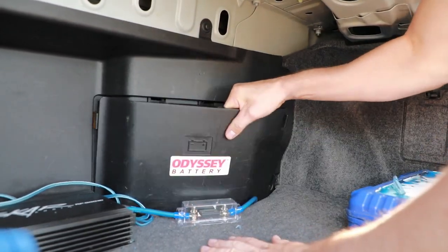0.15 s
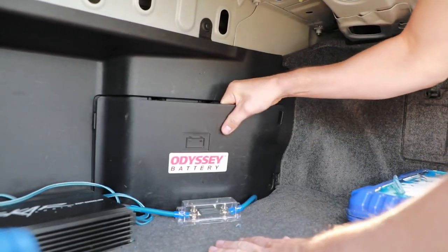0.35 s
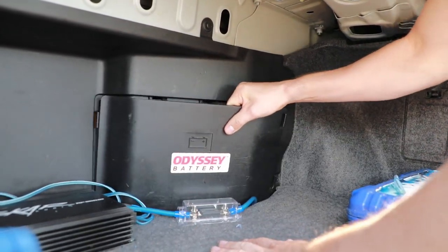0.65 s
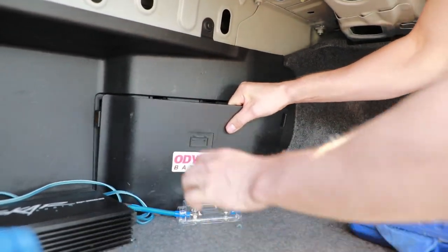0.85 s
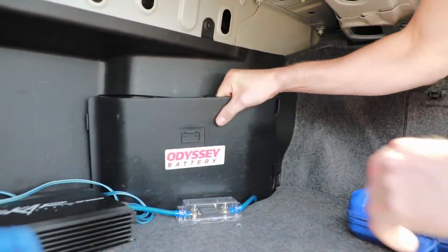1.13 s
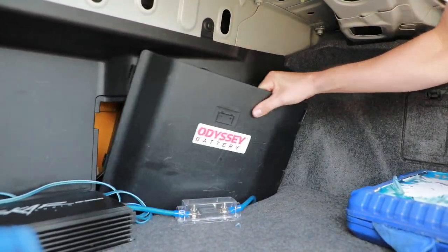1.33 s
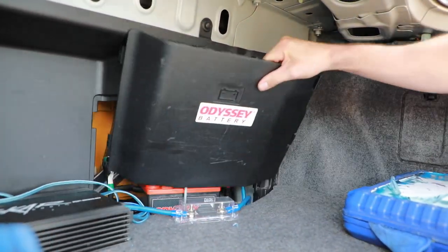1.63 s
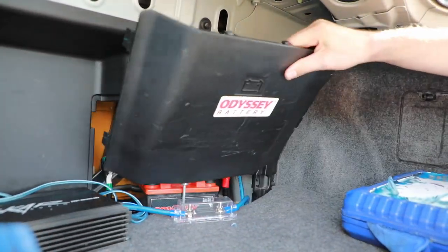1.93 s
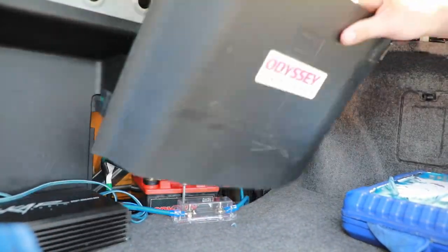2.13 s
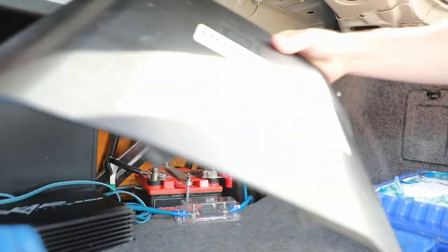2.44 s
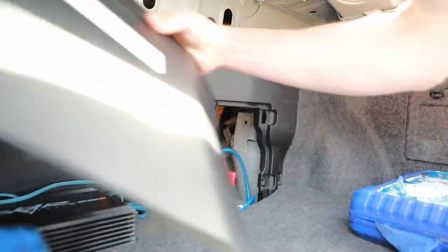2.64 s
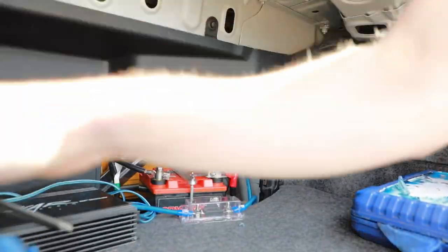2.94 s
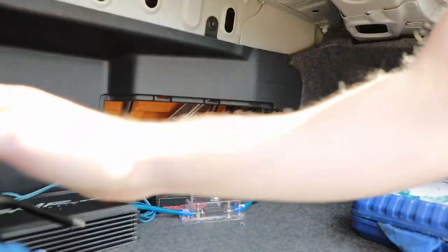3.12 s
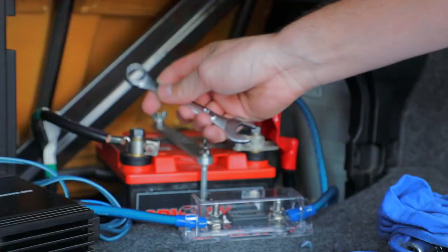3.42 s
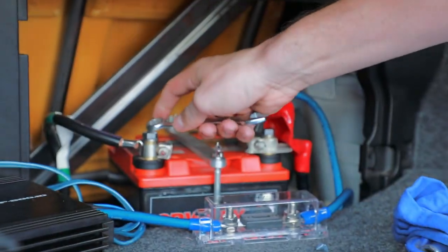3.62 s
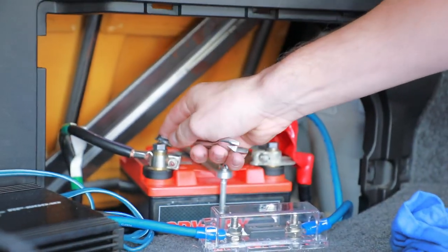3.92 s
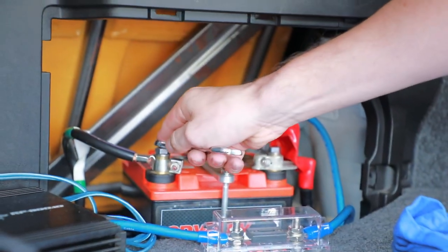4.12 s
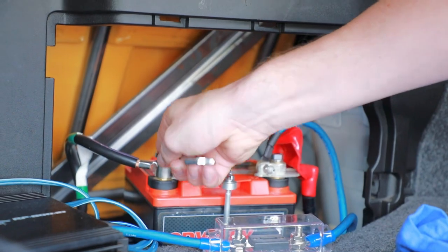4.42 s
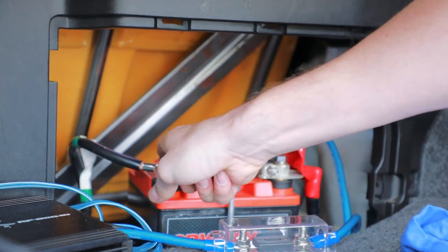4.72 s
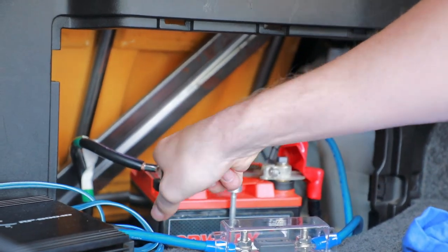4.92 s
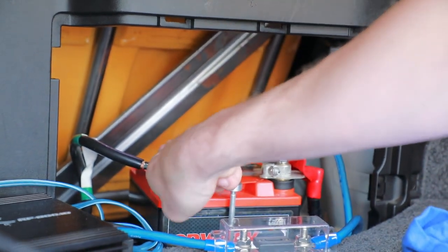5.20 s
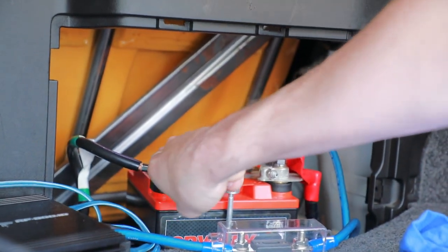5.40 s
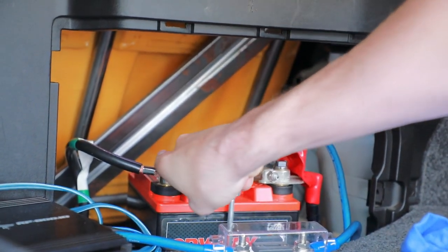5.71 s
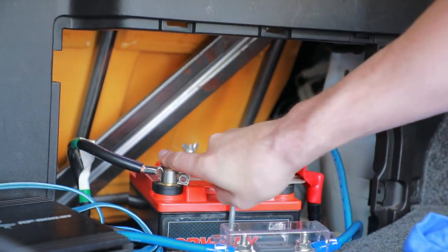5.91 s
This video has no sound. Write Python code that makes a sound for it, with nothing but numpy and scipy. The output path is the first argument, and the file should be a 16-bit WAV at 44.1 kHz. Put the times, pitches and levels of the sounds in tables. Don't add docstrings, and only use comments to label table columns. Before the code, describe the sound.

Hollow knocks and creaky friction come from a plastic cover being pried off, loudest as its clips snap free, with a short boxy reverberation. A flop, a clack and a dry scrape follow as it is put away. Then it turns quiet: bright steel ticks with short rings, soft knuckle brushing, tiny muffled contacts, a swelling far machine hum and a few thin bird whistles over steady road drone. Close microphone, slight hiss.

```python
import sys
import numpy as np
from scipy import signal
from scipy.fft import rfft, irfft
from scipy.io import wavfile
from scipy.ndimage import uniform_filter1d, map_coordinates

SR = 44100
rng = np.random.default_rng(int(sys.argv[2]) if len(sys.argv) > 2 else 0)


def file_out(sig):
    cols = np.atleast_2d(sig).T
    lim = np.clip(cols, -1, 1)
    pcm = np.round(lim * 32767).astype(np.int16)
    wavfile.write(sys.argv[1], SR, pcm)


def field_ratio(decibels):
    return 10 ** (np.asarray(decibels, dtype=float) / 20)


N = 267025
T = np.arange(N) / SR


def unit(x):
    return x / np.sqrt(np.mean(x ** 2) + 1e-20)


def peak(x):
    return x / np.max(np.abs(x))


def along(points, hz):
    f, v = np.transpose(points)
    return np.interp(np.log(hz + 1), np.log(f + 1), v)


def wobble(rate):
    knots = rng.standard_normal(int(N * rate / SR) + 4)
    return map_coordinates(knots, [T * rate])


def kernel(spectrum):
    hz = np.fft.rfftfreq(4096, 1 / SR)
    cepstrum = irfft(np.log(field_ratio(along(spectrum, hz))))
    cepstrum[1:2048] *= 2
    cepstrum[2049:] = 0
    h = irfft(np.exp(rfft(cepstrum)))
    return h / np.linalg.norm(h)


def ringing(modes, scatter_db):
    t = T[:SR // 4]
    h = np.zeros(len(t))
    for hz, db, t60 in modes:
        decay = field_ratio(db + scatter_db * rng.standard_normal() - 60 * t / t60)
        h += decay * np.sin(2 * np.pi * hz * t) * (1 - np.exp(-t / 0.001))
    return h / np.linalg.norm(h)


def chatter(t60, spiky, rise=0.00021, hold=0):
    t = T[:SR // 8]
    decay = field_ratio(-60 * np.maximum(t - hold, 0) / t60)
    onset = (1 - np.exp(-t / rise)) ** 2
    first_blow = 1 + 0.55 * np.exp(-t / 0.00069)
    bounces = rng.standard_normal(len(t)) * np.exp(spiky * rng.standard_normal(len(t)))
    return bounces * decay * onset * first_blow


def add(track, s, x):
    part = track[round(s * SR):][:len(x)]
    part += x[:len(part)]


def through(x, h):
    return signal.fftconvolve(x, h)[:max(len(x), len(h))]


def patchy(x, depth_db):
    z = signal.stft(np.pad(x, (0, 512)), nperseg=512)[2]
    field = rng.standard_normal(z.shape)
    field = uniform_filter1d(field, size=8, axis=0)
    field = uniform_filter1d(field, size=18, axis=1)
    return signal.istft(z * field_ratio(depth_db * unit(field)), nperseg=512)[1][:N]


# (frequency [Hz], density [dB per Hz])
TRAFFIC = [(20, -14), (55, 10), (90, -10), (200, -1.5), (450, -3), (900, 2.5), (1400, -0.5), (2200, -8),
           (3200, -18.5), (4000, -30.5), (4600, -57.5), (6000, -120)]


def traffic():
    air = patchy(rng.standard_normal(N), depth_db=2.0)
    level_db = -51.5 + .5 * wobble(0.36)
    return field_ratio(level_db) * unit(through(air, kernel(TRAFFIC)))


def strokes(rows):
    curves = [db - 20 * np.maximum((s - T) / rise, (T - s) / fall) for s, rise, fall, db in rows]
    return np.max(curves, axis=0)


# (frequency [Hz], density [dB per Hz])
RUB_BODY = [(50, -46), (100, -21.5), (300, 3), (700, -5), (1100, 0), (2000, -5.5), (3000, -9), (4500, -25),
            (6000, -35.5)]
RUB_RUSTLE = [(2000, -34), (3500, -6), (4600, -4), (5500, -12), (6900, 0), (8000, -4), (8800, -2),
              (9700, -5), (10600, 0), (11500, -3), (12400, -4), (13500, -12), (15100, -20), (16500, -50)]


def rub(body_db, rustle_db, spiky, lumpy_db):
    def slips():
        clumps = field_ratio(lumpy_db * wobble(45.31))
        return rng.standard_normal(N) * np.exp(spiky * wobble(900)) * clumps

    body = unit(through(slips(), kernel(RUB_BODY)))
    rustle = unit(patchy(through(slips(), kernel(RUB_RUSTLE)), depth_db=2))
    return field_ratio(body_db) * body + field_ratio(rustle_db) * rustle


def stroked(rows, spiky, lumpy_db):
    body_db = strokes([row[:4] for row in rows])
    rustle_db = strokes([(s, rise, fall, db + over_db) for s, rise, fall, db, over_db in rows])
    return rub(body_db, rustle_db, spiky, lumpy_db)


# (peak time [s], rise [s], fall [s], body level [dB], rustle over body [dB])
DRAG = [(.15, 0.25, 0.34, -44, -16.5), (.45, 1, 0.56, -48.5, -14), (.89, 0.077, 0.44, -45.5, -31),
        (1.16, 0.11, 0.31, -40, -13.5), (1.29, 0.051, 0.14, -29.5, -16.5),
        (1.575, 0.075, 0.44, -40.5, -8.5), (1.612, 0.062, 0.16, -33.5, -16), (1.95, 0.7, 0.95, -52, -3.5),
        (2.3, 0.49, 0.53, -52, -15), (2.5, 0.8, 0.4, -54, -6), (3.085, 0.36, 0.074, -50.5, -2)]


def dragging():
    free_s = 1.75
    lumpy_db = np.where(T < free_s, 3.5, .9)
    return field_ratio(-4.0) * stroked(DRAG, spiky=.2, lumpy_db=lumpy_db)


# (frequency [Hz], density [dB per Hz])
WOBBLE = [(60, -20.5), (110, 0.5), (140, 2), (200, -8), (400, -33.5)]
# (peak time [s], rise [s], fall [s], level [dB])
FLEXING = [
    (.35, 1.3, 0.3, -64),
    (.95, 0.13, 0.23, -52.5),
    (1.25, 0.38, 0.26, -56),
    (1.7, 0.35, 0.37, -59),
    (2.33, 0.1, 0.33, -61),
]


def flexing():
    return field_ratio(strokes(FLEXING)) * unit(through(rng.standard_normal(N), kernel(WOBBLE)))


# (frequency [Hz], density [dB per Hz])
THUMP = [(40, -24), (100, -13.5), (220, 4), (450, 1), (800, -47), (2000, -92)]
# (frequency [Hz], level [dB], T60 [s])
PANEL = [(125, -10, .3), (215, -14, .06), (253, -3, .16), (300, -9, .12), (484, 1, .075), (545, -1, .06),
         (600, -3, .065), (651, -4, .07), (883, -11, .09), (1238, -9, .09), (1384, -5, .08),
         (1523, -5, .065), (1950, -2, .055), (2300, -6, .05)]
# (time [s], thump level [dB], ring level [dB], chatter T60 [s])
THUDS = [(0.012, -28.5, -68, 0.033), (.059, -32, -72, 0.032), (0.23, -34.5, -62, 0.15),
         (0.294, -34.5, -69, 0.083), (0.429, -23.5, -70, 0.041), (.831, -36, -70, 0.028),
         (.933, -23, -69.5, 0.08), (1.38, -40, -66, .04), (1.801, -33, -68, 0.028), (2.068, -57, -73, .03),
         (2.199, -50, -70, 0.018), (2.243, -32.5, -14.5, 0.029), (3.439, -50, -72, 0.026)]


def thuds():
    out, thump = np.zeros(N), kernel(THUMP)
    for s, thump_db, ring_db, t60 in THUDS:
        force = chatter(t60, spiky=0.12, rise=0.001)
        force[0] = 1.24 * np.linalg.norm(force)
        add(out, s, field_ratio(thump_db) * peak(through(force, thump)))
        rattle = chatter(0.06, spiky=0.28, rise=.0005, hold=0.0091)
        rattle = rattle / np.linalg.norm(rattle)
        add(out, s - .004, field_ratio(ring_db) * through(rattle, ringing(PANEL, scatter_db=1)) * 20)
    return out


# (frequency [Hz], density [dB per Hz])
BOOM = [(50, -54), (100, -8), (200, 1.5), (450, 5.5), (800, -3), (1600, -36.5)]
CLACK = [(300, -28.5), (700, -5.5), (1400, 3), (2600, -2.5), (4000, -15), (7000, -31.5)]
CRACK = [(2200, -40), (3600, -4), (5500, -7), (7500, 0), (11000, -3), (13000, -15), (16000, -34)]
# (time [s], peak level [dB], crack level [dB], local note [Hz], chatter T60 [s])
ROCKING = [(0.013, -27.5, -41, 520, 0.023), (0.066, -15, -18, 890, 0.031), (0.103, -33.5, -22, 420, 0.019),
           (.137, -37, -25, 410, 0.065), (0.157, -33.5, -23, 525, 0.024), (.166, -30, -26, 880, 0.027),
           (0.291, -32, -27, 1440, 0.028), (.3, -38.5, -29, 500, 0.056), (.327, -41, -23, 900, 0.019),
           (.418, -30, -25, 616, 0.037), (0.408, -30, -25, 920, 0.025), (0.428, -13.5, -47, 420, 0.012),
           (0.44, -16.5, -39, 950, 0.016), (0.515, -34, -24, 1450, 0.03), (.531, -37.5, -36, 1980, 0.012),
           (0.564, -43, -33, 915, 0.047), (.585, -37.5, -22, 1210, 0.08), (0.615, -31.5, -26, 2030, 0.027),
           (0.635, -34, -20, 1910, 0.03), (0.671, -44, -29, 926, 0.037), (0.732, -32.5, -24, 930, 0.11),
           (0.78, -33.5, -41, 405, 0.028), (.774, -44, -35, 900, 0.016), (0.82, -40, -20, 1180, 0.043),
           (.846, -40.5, -25, 880, 0.043)]
UNCLIPPING = [(.901, -35.5, -30, 950, 0.066), (.928, -28, -26, 446, 0.037), (.94, -10.5, -19, 930, 0.057),
              (1.008, -33, -26, 1000, 0.024), (1.069, -36.5, -28, 890, 0.077),
              (1.089, -24, -27, 397, 0.019), (1.101, -24, -30, 1380, 0.044), (1.117, -19.5, -27, 700, .03),
              (1.1435, -22, -12, 1500, 0.016), (1.1478, -3.5, -11.5, 1514, 0.03),
              (1.153, -17, -17.5, 1713, 0.051), (1.2, -20.5, -25.5, 732, 0.037),
              (1.216, -27.5, -17.5, 1230, 0.02), (1.231, -16.5, -25, 1513, 0.093),
              (1.2435, -5.5, -24, 952, 0.045), (1.253, -1.5, -25.5, 597.5, .06),
              (1.262, -5.5, -18, 645, 0.055), (1.272, -14.5, -18, 500, 0.057),
              (1.2865, -1.5, -9, 1900, 0.016), (1.29, -8.5, -10.5, 1913, 0.046),
              (1.296, -15, -11.5, 1028, .04), (1.308, -11.5, -17.5, 1330, 0.053),
              (1.32, -15.5, -18.5, 1200, .05), (1.33, -21, -28.5, 1900, 0.033),
              (1.343, -24.5, -33, 1970, 0.028)]
LIFTING = [(1.405, -19, -30, 1800, 0.05), (1.411, -24, -25, 2350, 0.047),
           (1.418, -26.5, -18.5, 1640, 0.014), (1.595, -35, -20, 1920, 0.071),
           (1.609, -36, -20, 1490, 0.055), (1.6215, -7.5, -13.5, 1010, 0.044), (1.629, -16, -14, 696, 0.06),
           (1.643, -17, -18, 880, 0.07), (1.664, -17, -18, 1410, 0.044), (1.686, -16.5, -15, 1110, 0.041),
           (1.691, -14, -14.5, 1520, 0.06), (1.711, -17, -27, 1250, 0.049), (1.753, -33.5, -31, 845, 0.034),
           (1.807, -29.5, -26, 537, 0.024), (1.8255, -19.5, -33, 1050, 0.012),
           (1.862, -38, -7, 1810, 0.044), (1.87, -39, -5.5, 1380, 0.04), (1.895, -34.5, -20, 1420, 0.04),
           (1.908, -43, -30, 950, 0.027)]
LAYING = [(2.238, -5, -17.5, 1560, 0.062), (2.509, -43, -10, 875, 0.026), (2.693, -42.5, -12, 1140, 0.028),
          (2.734, -40.5, -6, 1100, 0.024), (2.743, -36.5, -13, 1740, 0.032), (2.796, -35, -11, 1650, 0.04),
          (2.858, -22, -26, 2080, 0.037), (2.908, -26.5, -30, 520, 0.049), (2.872, -13, -21.5, 984, 0.04),
          (2.949, -27.5, -26, 1310, 0.038), (2.967, -29.5, -5, 2020, 0.022),
          (3.024, -36, -16, 1100, 0.0087), (3.084, -42.5, -15.5, 840, 0.04)]
IN_BETWEEN = [
    (1.122, -20, -18, 2300, 0.023),
    (1.163, -19, -31, 420, .03),
    (1.2575, -8, -20.5, 850, .025),
    (1.277, -14.5, -24.5, 420, .03),
    (1.2965, -14, -5.5, 2600, .04),
    (1.339, -18.5, -28, 695, 0.019),
    (2.251, -13.5, -19, 1400, 0.014),
    (2.258, -17.5, -24, 606, 0.021),
]


def knocks():
    out, boom, clack, crack = np.zeros(N), kernel(BOOM), kernel(CLACK), kernel(CRACK)
    stages = ((ROCKING, -10), (UNCLIPPING, -10), (LIFTING, -11.5), (LAYING, -25), (IN_BETWEEN, -14))
    for rows, seated_db in stages:
        for s, db, crack_db, hz, t60 in rows:
            boom_db = seated_db - 0.27 * (db + 25)
            rise = .0002 + .00009 * max(-5 - db, 0)
            force = chatter(t60, spiky=0.13, rise=rise)
            note = ringing([(hz, 0, .01)], scatter_db=0)
            low = through(chatter(1.4 * t60, spiky=0.4, rise=rise), boom)
            mid = through(force, .75 * clack + 0.63 * note[:4096])
            high = through(chatter(t60, spiky=0.19, rise=rise), crack)
            add(out, s, field_ratio(db - 1.54) * peak(mid))
            add(out, s, field_ratio(db + boom_db + 3.0) * peak(low))
            add(out, s, field_ratio(db + crack_db + 7.5) * peak(high))
    return out


# (from [s], to [s], level [dB])
CARRY = (1.56, 3.1, -63)


def carrying():
    start, end, db = CARRY
    fade = np.clip(np.minimum((T - start) / .15, (end - T) / .04), 0, 1)
    return fade * rub(db - 3, db + 1.2 * wobble(5), spiky=.1, lumpy_db=1)


# (time [s], peak level [dB], from [Hz], to [Hz], fall [s], T60 [s])
FLOP = (2.128, -30, 560, 90, .006, .045)


def flop():
    out, t = np.zeros(N), T[:SR // 8]
    s, db, from_hz, to_hz, fall, t60 = FLOP
    hz = to_hz + (from_hz - to_hz) * np.exp(-t / fall)
    envelope = field_ratio(-60 * t / t60) * (1 - np.exp(-t / .004)) ** 2
    add(out, s, field_ratio(db) * peak(envelope * np.sin(2 * np.pi * np.cumsum(hz) / SR)))
    return out


# (frequency [Hz], gain [dB])
SLIDE_THIN = [(100, -6), (400, -11), (1000, -5), (16000, -1)]
# (peak time [s], rise [s], fall [s], body level [dB], rustle over body [dB])
SLIDE = [
    (2.803, 0.0071, 0.044, -33.5, -5),
    (2.818, 0.03, 0.035, -27.5, -12),
    (2.864, 0.034, .04, -26.5, -1),
    (2.895, 0.06, 0.047, -29, -3.5),
    (2.951, 0.0079, 0.035, -26, -11),
    (2.968, 0.023, .03, -35, -10.5),
]


def scraping():
    thin = kernel(SLIDE_THIN)
    return through(stroked(SLIDE, spiky=0.25, lumpy_db=1.0), thin / np.max(np.abs(rfft(thin))))


def pings(hits, modes):
    out = np.zeros(N)
    for s, db in hits:
        add(out, s, field_ratio(db) * peak(ringing(modes, scatter_db=1)))
    return out


# (frequency [Hz], level [dB], T60 [s])
PART = [(1280, -5, .03), (1530, -2, .02), (1800, -6, .015), (2100, -6, .02), (3280, -8, .06),
        (5200, -22, .006)]
# (time [s], peak level [dB])
PING = [
    (3.252, -27),
]


def dropped_part():
    return pings(PING, PART)


# (frequency [Hz], density [dB per Hz])
SNAP = [(2500, -50.5), (4000, -14), (5500, -6), (7500, -0.5), (10000, -7), (13000, -15), (16000, -32.5)]
# (frequency [Hz], level [dB], T60 [s])
STEEL = [(7320, -17, .022), (9460, -5, .022), (9680, 0, .032), (9870, -3, .024), (10900, -17, .02),
         (11500, -17, .015), (13400, -26, .015), (14290, -13, .022)]
# (frequency [Hz], level [dB], T60 [s])
NUT = [(275, -11, .09), (390, -8, .05), (580, -2, .045), (870, -2, .04), (1840, -1, .009), (2300, 0, .008),
       (2750, -7, .006), (4200, -13, .006)]
# (time [s], peak level [dB], nut knock [dB], ring share [dB], own note [Hz])
TICKS = [(3.5557, -62.5, -12, -1.5, 4100), (3.5916, -20, -11, 4, 9500), (3.6229, -26, -11.5, -22, 6130),
         (3.752, -28, -10.5, -3, 9950), (3.899, -47.5, 3, -2, 5800), (4.0487, -53.5, 12, -5, 4250),
         (4.2476, -39, 7, -23, 10100), (4.2967, -54.5, 3, -14, 7800), (4.3291, -51, -14, -7, 7970),
         (4.351, -32, 2, -35, 6050), (4.393, -58, -8, -5, 9700), (4.411, -31, 7.5, -28, 2420),
         (4.492, -16, -12, -1, 10200)]
# (time [s], peak level [dB], own note [Hz], nut knock level [dB])
GRIPPED = [(4.595, -55, 7660, -50), (4.6274, -53.5, 7600, -49), (4.6605, -55, 9700, -52),
           (4.729, -50.5, 9600, -51), (4.763, -57, 9650, -54), (4.8453, -49.5, 3650, -53),
           (4.862, -56, 7390, -62), (4.93, -58.5, 2990, -51), (4.994, -53.5, 8000, -60.5),
           (5.029, -49, 9540, -59), (5.146, -59, 9280, -64), (5.161, -58, 7430, -62),
           (5.1966, -51.5, 7760, -52.5), (5.2216, -59, 7310, -57), (5.477, -50, 7160, -57),
           (5.491, -43, 10450, -50), (5.528, -33.5, 9700, -55.5), (5.689, -45, 10300, -55),
           (5.731, -49.5, 9500, -60)]


def spanner():
    out, crack, clack = np.zeros(N), kernel(SNAP), kernel(CLACK)
    loose_t60, gripped_t60, blow_t60 = 0.028, 0.027, 0.011
    contacts = [(*row, loose_t60) for row in TICKS]
    for s, db, hz, nut_db in GRIPPED:
        contacts.append((s, db, nut_db - db, -120, hz, gripped_t60))
    for s, db, nut_db, ring_db, hz, t60 in contacts:
        rise = .0004 + .00004 * max(-25 - db, 0)
        force = chatter(t60, spiky=.25, rise=rise, hold=.003)
        rattle = chatter(.5 * t60, spiky=.3, rise=.001, hold=.006)
        blow = chatter(blow_t60, spiky=.2, rise=rise, hold=.003)
        ring = through(blow, ringing(STEEL, scatter_db=1.5))
        note = ringing([(hz, 0, .004)], scatter_db=0)
        spot = through(force, .35 * note[:4096] + .7 * crack)
        post = through(rattle, ringing(NUT[4:], scatter_db=1)[:4096] + .4 * clack)
        case = through(rattle, ringing(NUT[:4], scatter_db=1.5))
        add(out, s, field_ratio(db + ring_db) * peak(ring))
        add(out, s, field_ratio(db + nut_db) * peak(post))
        add(out, s + .003, field_ratio(db + nut_db - 9) * peak(case))
        add(out, s, field_ratio(db - 4.5) * peak(spot))
    return out


# (frequency [Hz], level [dB], T60 [s])
SHANK_MODES = [(6089, 0, .075), (14720, -19, .06), (2900, -2, .022), (2290, -12, .03), (4463, -20, .025),
               (7500, -18, .04)]
# (time [s], peak level [dB])
SHANK = [
    (3.593, -26),
    (3.626, -40.5),
]


def shank():
    return pings(SHANK, SHANK_MODES)


# (peak time [s], rise [s], fall [s], body level [dB], rustle over body [dB])
BRUSH = [
    (3.93, .03, .1, -48, -14),
    (3.965, .1, .03, -50, -13),
    (4.11, .022, .026, -53, -14),
]


def brushing():
    return stroked(BRUSH, spiky=.17, lumpy_db=1.5)


# (time [s], level [dB])
HUM = [
    (4.1, -60),
    (4.202, -63.5),
    (4.518, -65.5),
    (4.664, -60),
    (4.816, -70.5),
    (4.87, -58.5),
    (5.554, -52),
    (5.892, -53),
    (6.05, -55),
]


def hum():
    times, levels = np.transpose(HUM)
    turn = 2 * np.pi * 181.9 * T
    beat_hz, crest_s, depth = 3.9, 5.715, .85
    beat = (1 + depth * np.cos(2 * np.pi * beat_hz * (T - crest_s))) / (1 + depth)
    lines = field_ratio(1.4 * wobble(12)) * np.sin(turn)
    lines += field_ratio(-2.5 + 1.5 * wobble(8)) * beat * np.sin(2 * turn)
    lines += field_ratio(-12.5 + 3.5 * wobble(4)) * np.sin(3 * turn)
    lines += field_ratio(-16.5 + 3.24 * wobble(3.73)) * np.sin(3 * turn / 2)
    fade_in = np.clip((T - 4.1) / 0.088, 0, 1)
    return np.sqrt(2) * field_ratio(np.interp(T, times, levels)) * lines * fade_in


# (time [s], length [s], from [Hz], to [Hz], level [dB])
CHIRPS = [
    (4.819, 0.026, 3150, 3450, -69.5),
    (5.084, 0.038, 2500, 2620, -63),
    (5.44, 0.0447, 2490, 2800, -62),
    (5.585, 0.025, 4800, 5960, -75),
]


def bird():
    out = np.zeros(N)
    for s, length, from_hz, to_hz, db in CHIRPS:
        u = np.linspace(0, 1, round(length * SR))
        flutter_db = 31 * uniform_filter1d(rng.standard_normal(len(u)), size=100)
        hz = from_hz + (to_hz - from_hz) * np.sqrt(u)
        whistle = np.sin(2 * np.pi * np.cumsum(hz) / SR)
        add(out, s, field_ratio(db + flutter_db) * np.sin(np.pi * u) * whistle)
    return out


# (frequency [Hz], T60 [s])
TRUNK = [(150, 0.27), (1000, 0.1), (5000, 0.077), (12000, 0.0066)]


def trunk(x):
    out, step = np.zeros(N), SR // 3
    for k in range(0, N, step):
        hz, t, z = signal.stft(rng.standard_normal(SR // 4), SR, nperseg=256)
        decay = field_ratio(-60 * t / along(TRUNK, hz)[:, None])
        tail = signal.istft(z * decay, SR, nperseg=256)[1]
        add(out, k / SR + .002, signal.fftconvolve(x[k:k + step], tail / np.linalg.norm(tail)))
    return out


def scene():
    cover = dragging() + flexing() + thuds() + knocks() + carrying() + flop() + scraping()
    cover = cover + dropped_part() + shank() + brushing()
    steel = spanner()
    reverberation = field_ratio(-10.5) * trunk(cover + field_ratio(-2) * steel)
    return (traffic() + cover + steel + reverberation + hum() + bird())[None]


def roll_off(x):
    return signal.sosfilt(signal.butter(12, 16810, fs=SR, output="sos"), x)


# (frequency [Hz], gain [dB])
MIC = [(20, -24), (60, -14), (110, -3), (160, 0), (15300, 0), (16000, -8), (16800, -30)]
# (frequency [Hz], density [dB per Hz])
HISS = [(2200, -30), (3800, -2), (4600, -3), (5600, -8), (6600, -2), (7500, -3), (8500, -7), (9800, -5),
        (12000, -7), (15000, -11), (15800, -14), (16100, -40)]


def record(dry):
    colour = kernel(MIC)
    x = through(dry[0], colour / np.max(np.abs(rfft(colour))))
    x = x + field_ratio(-72.3) * unit(through(rng.standard_normal(N), kernel(HISS)))
    x = x / (1 + np.abs(x / .98) ** 8) ** (1 / 8)
    return roll_off(x[None])


dry = scene()
out = record(dry)
file_out(out)
```